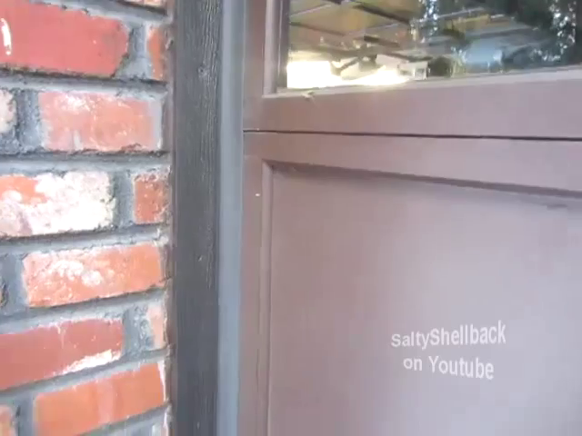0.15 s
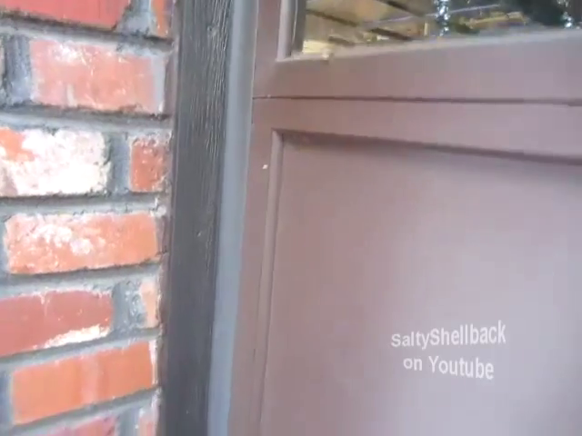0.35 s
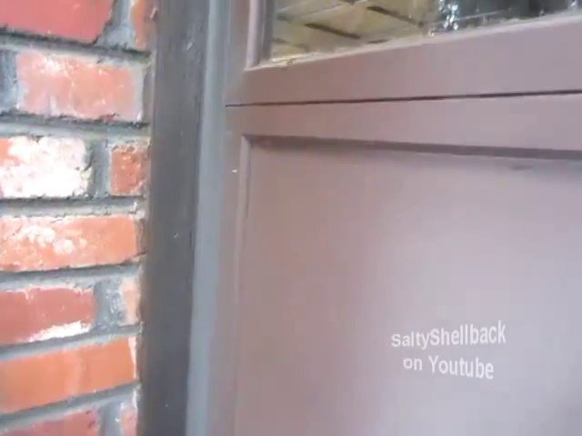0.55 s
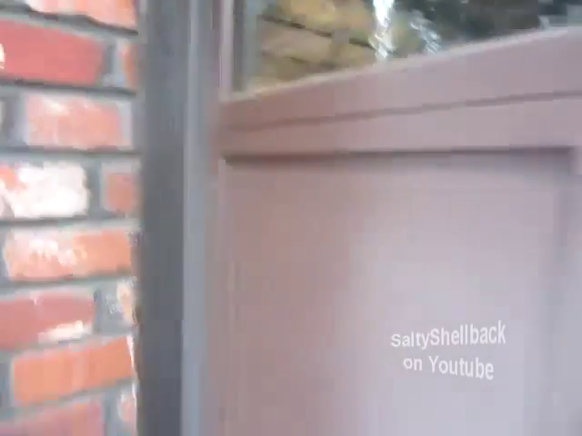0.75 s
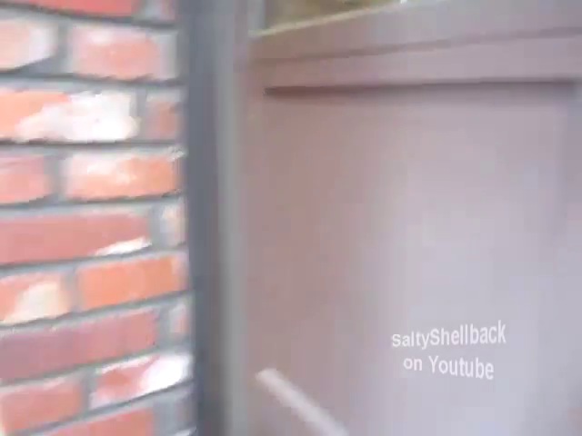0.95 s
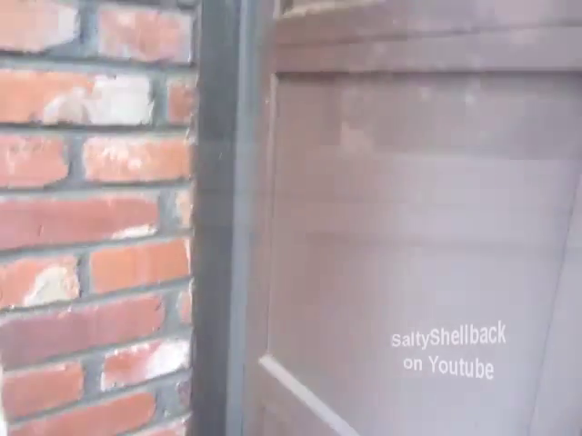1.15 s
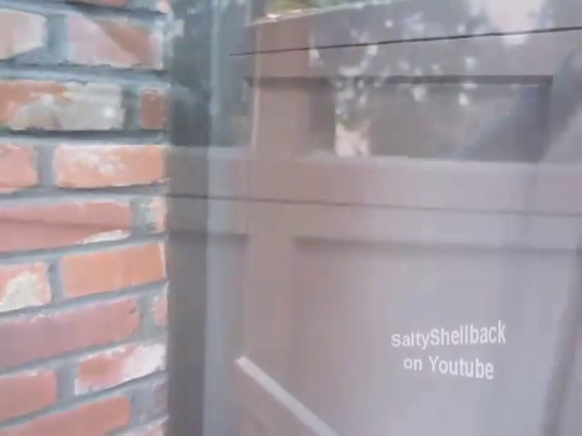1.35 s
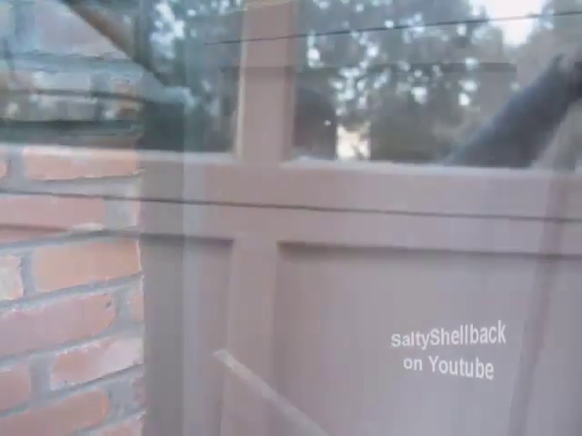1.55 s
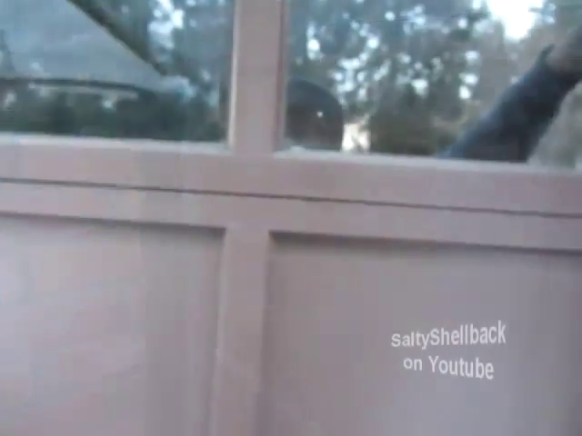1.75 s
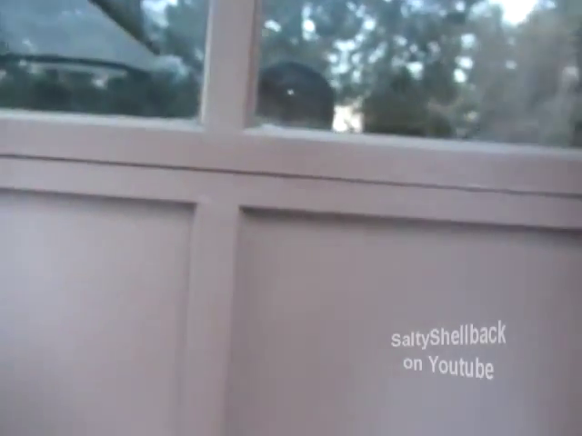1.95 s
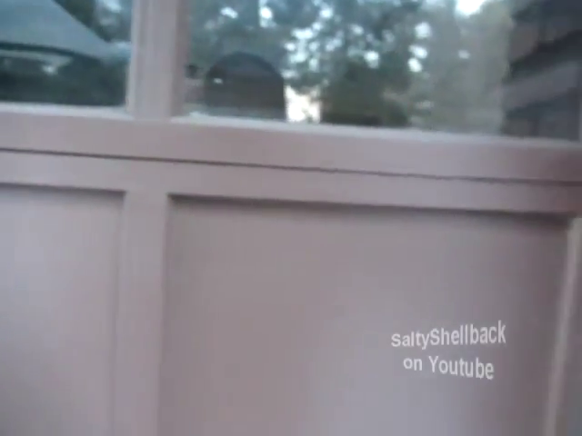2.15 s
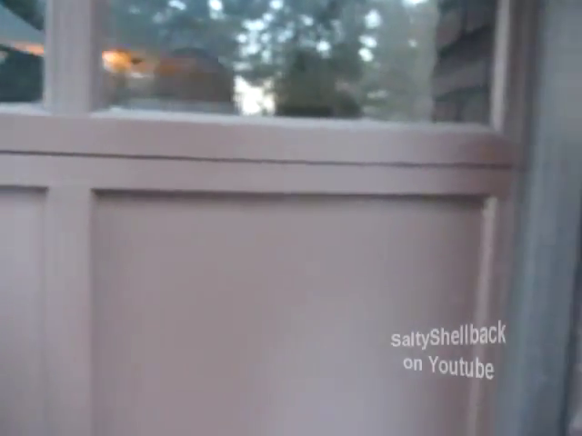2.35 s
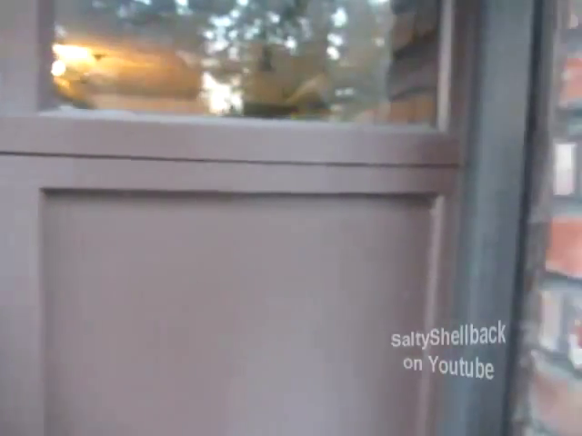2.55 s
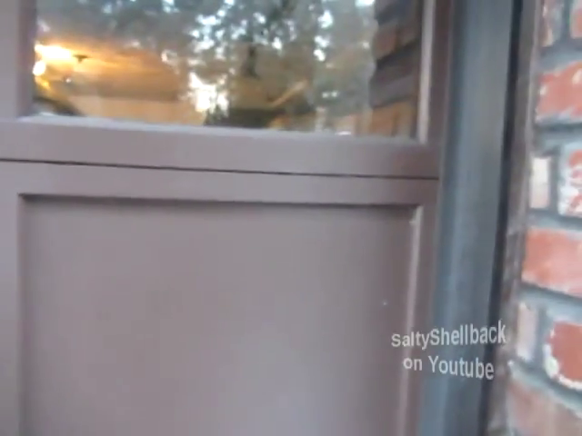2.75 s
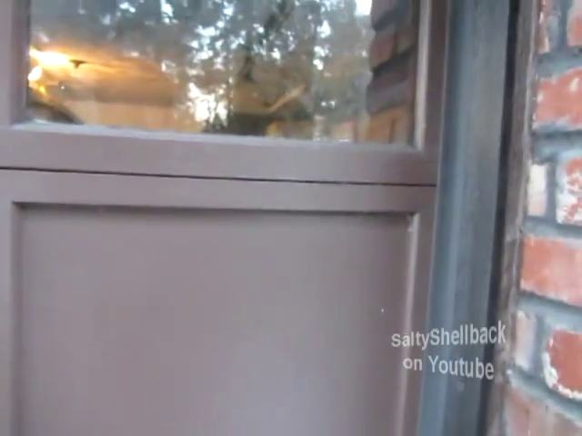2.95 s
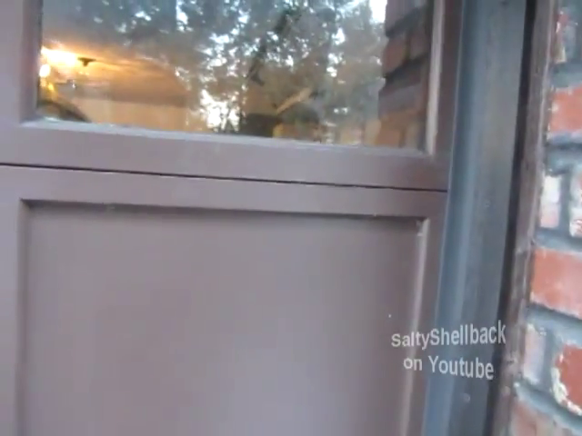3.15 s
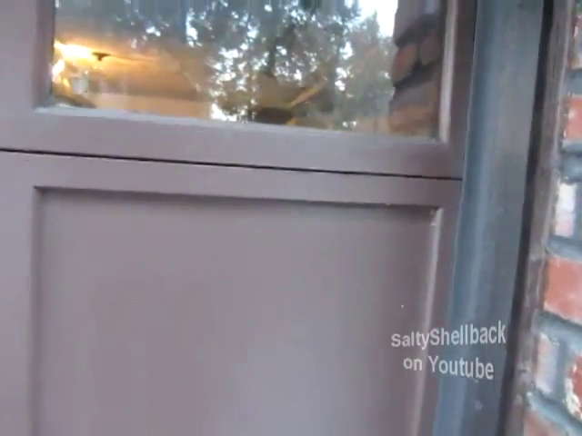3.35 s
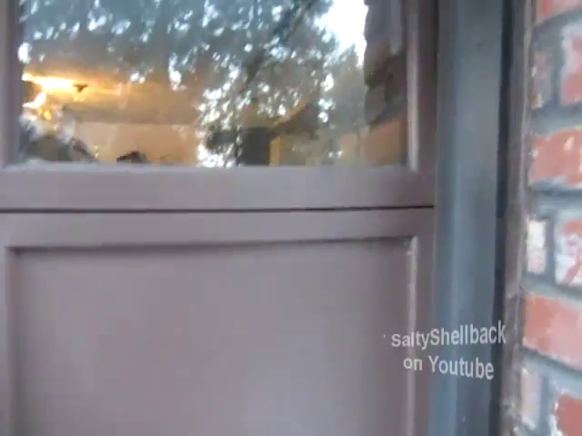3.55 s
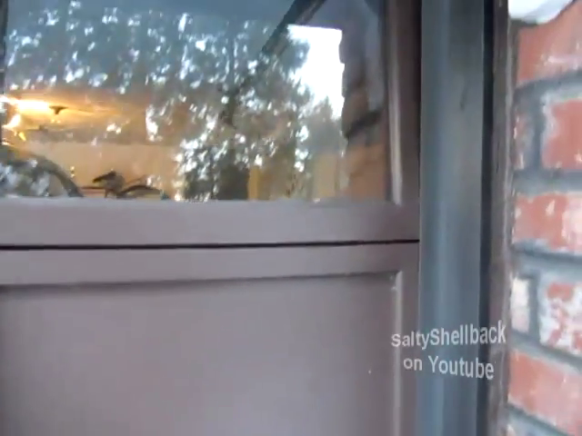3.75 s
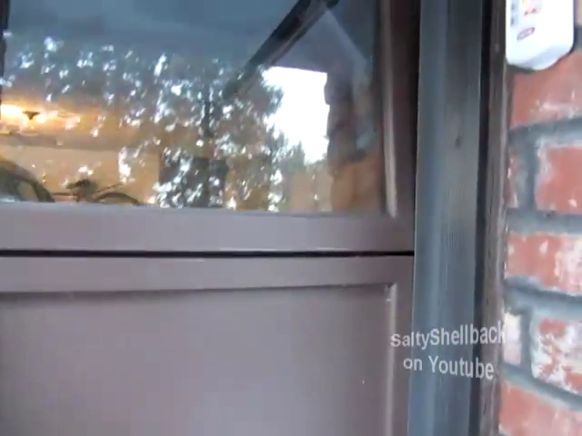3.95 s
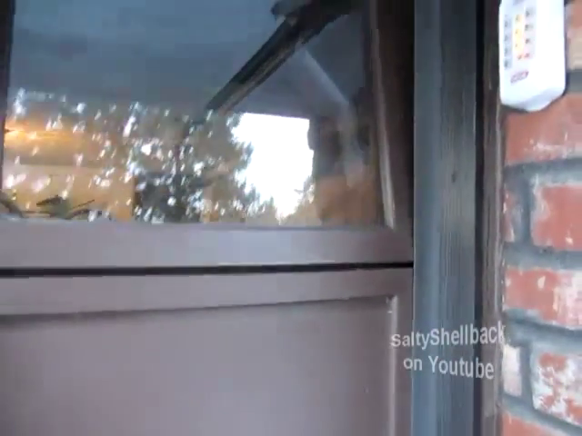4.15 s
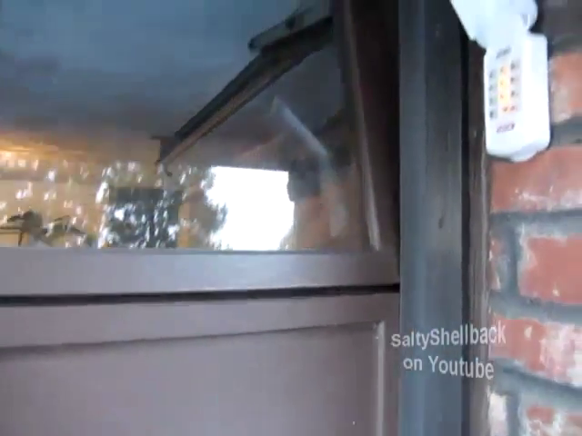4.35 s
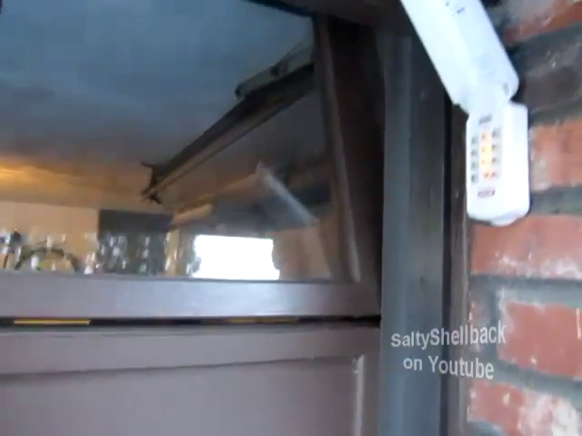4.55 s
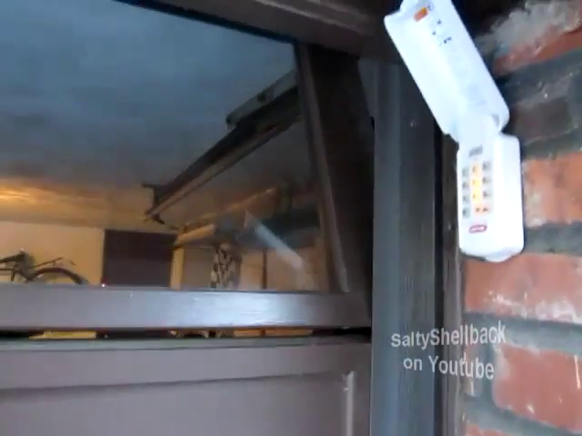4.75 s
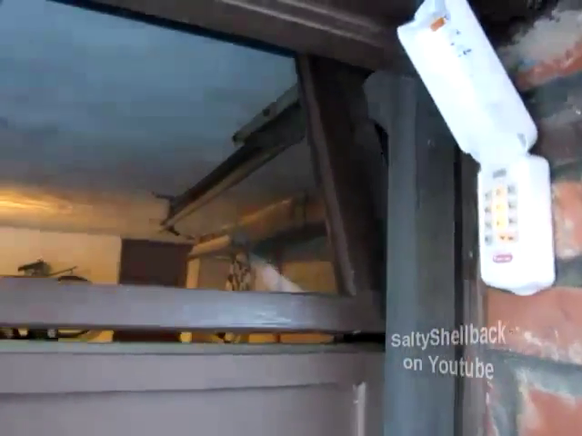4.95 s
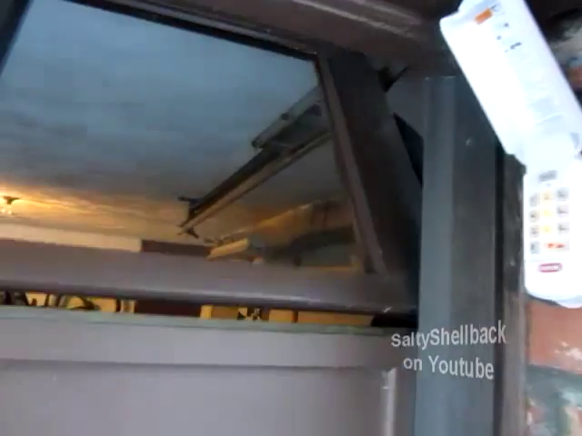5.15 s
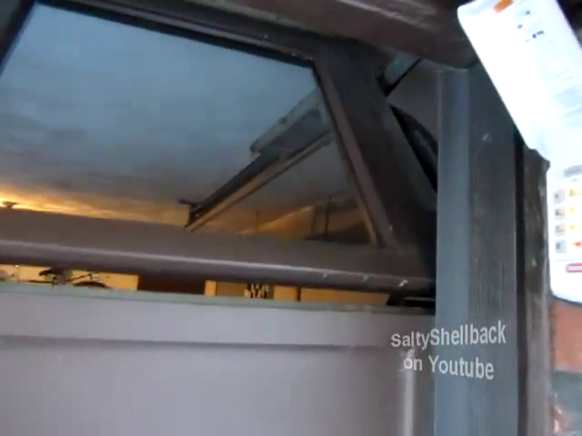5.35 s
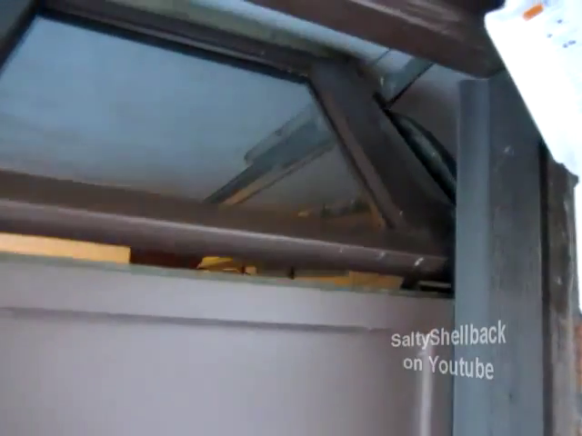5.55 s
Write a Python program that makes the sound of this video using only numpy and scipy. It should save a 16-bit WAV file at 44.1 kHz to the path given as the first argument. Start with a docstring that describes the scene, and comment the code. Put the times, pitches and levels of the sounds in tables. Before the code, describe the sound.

A wooden sectional garage door creaks and ticks, breaks loose with a heavy rattling thump, then rumbles and rattles up its tracks.

```python
"""A wooden sectional garage door is raised, heard in stereo from close by on the driveway.
Its joints creak and tick under strain: short chatters of noise ring the wooden frame and steel hinges.
It breaks free with a rattling thump of damped low sines and rolls up its tracks on tiny random impacts:
panels rumble, rollers and hinges rattle, edges rub along the new weather-stripping and squeak.
The opener's faint whine, a stack of wavering sines, rises behind it, over a dull, quiet background noise."""
import sys
import numpy as np
from scipy import signal
from scipy.fft import rfft, irfft
from scipy.io import wavfile
from scipy.ndimage import uniform_filter1d, minimum_filter1d, map_coordinates

SR = 44100
rng = np.random.default_rng(int(sys.argv[2]) if len(sys.argv) > 2 else 0)


def wrap_up_sound(samples):
    """Save the sound to the file named by the first command line argument, as 16-bit audio."""
    columns = np.atleast_2d(samples).T
    # keep every value between -1 and 1, then stretch to whole-number steps
    tamed = np.clip(columns, -1, 1)
    steps = np.round(tamed * 32767).astype(np.int16)
    wavfile.write(sys.argv[1], SR, steps)


N = 247842
TIME = np.arange(N) / SR
HZ = np.maximum(np.fft.rfftfreq(N, 1 / SR), 1)
LEFT_RIGHT = np.array([[1], [-1]])


def from_db(db):
    """Decibels to gain."""
    return 10 ** (np.asarray(db) / 20)


def rms_one(x):
    """Scale to unit rms."""
    return x / np.sqrt(np.mean(x ** 2) + 1e-20)


def at_hz(points):
    """Read a table over log frequency."""
    hz, value = np.transpose(points)
    return np.interp(np.log(HZ), np.log(hz), value)


def band(x, low_hz, high_hz, order=2):
    """Butterworth band-pass."""
    edges = [low_hz, min(high_hz, SR / 2 - 500)]
    return signal.sosfilt(signal.butter(order, edges, "band", fs=SR, output="sos"), x)


def resonate(x, hz, width_hz):
    """One resonance with about unit gain at its top."""
    radius = np.exp(-np.pi * width_hz / SR)
    zeros = np.array([1, 0, -1]) * (1 - radius * radius) / 2
    poles = [1, -2 * radius * np.cos(2 * np.pi * hz / SR), radius * radius]
    return signal.lfilter(zeros, poles, x + 1e-18)


def drift(rate):
    """Smooth chance of rms 1, with `rate` random knots a second."""
    knots = rng.standard_normal(4000)
    return rms_one(np.interp(TIME * rate, np.arange(len(knots)), knots))


# Balance of the two microphones. Each row: frequency in Hz, left over right in dB.
STEREO_BALANCE = [(120, -1), (300, 0), (1000, 2), (2000, -1), (8000, 0)]


def spread(pair, colour, likeness):
    """Colour two unrelated signals and mix them to left and right with the given likeness; rms 1."""
    mid, side = rfft(pair) * from_db(at_hz(colour))
    alike = np.clip(at_hz(likeness), -1, 1)
    both = np.sqrt(1 + alike) * mid + np.sqrt(1 - alike) * side * LEFT_RIGHT
    return rms_one(irfft(both * from_db(LEFT_RIGHT * at_hz(STEREO_BALANCE) / 2), N))


# Colour of the quiet background noise: low and soft. Each row: frequency in Hz, relative density in dB per Hz.
BACKGROUND_COLOUR = [(20, -23), (45, -12), (85, -4.5), (140, -1.5), (200, -8.5), (460, -10), (850, -15.5),
                     (1300, -22), (3000, -27), (3900, -36), (5500, -31.5), (10900, -42.5), (12500, -71),
                     (15500, -72)]
# How alike the background is at both microphones. Each row: frequency in Hz, likeness from -1 to 1.
BACKGROUND_LIKENESS = [(60, 0.76), (150, -0.76), (380, -0.55), (950, -0.29), (2380, 0.063), (5980, -0.36),
                       (15000, 0.04)]


def background(level_db=-46.5):
    """Steady wide noise, coloured as a dull, quiet background."""
    return from_db(level_db) * spread(rng.standard_normal((2, N)), BACKGROUND_COLOUR, BACKGROUND_LIKENESS)


def contacts(per_s, size_db, smooth, judder_db, judder_rate):
    """Tiny random impacts of uneven size over smooth friction, coming in judders."""
    born = rng.random(N) < per_s / SR
    sizes = from_db(size_db * np.minimum(rng.exponential(1, N), 3))
    grains = rms_one(born * sizes * rng.standard_normal((2, N)))
    friction = smooth * rng.standard_normal((2, N))
    return (grains + friction) * from_db(judder_db * drift(judder_rate))


def rattles(low_hz, high_hz, per_s, width_hz, size_db, count=24):
    """Loose parts of many sizes are jogged at random; each rings briefly at its own pitch."""
    born = rng.random(N) < per_s / SR
    jogs = born * from_db(size_db * rng.standard_normal(N)) * rng.choice([-1, 1], (2, N))
    dealt = rng.integers(0, count, N)
    pitches = np.linspace(low_hz, high_hz, count) + rng.normal(0, width_hz / 2, count)
    return rms_one(sum(resonate(jogs * (dealt == part), hz, width_hz) for part, hz in enumerate(pitches)))


# Resonances that ring along as the door shakes, mostly of the steel tracks and hinges, with a few lines near
# 670, 730 and 940 Hz. Each row: frequency in Hz, width in Hz, relative level in dB.
TRACK_MODES = [(262.8, 12, -1), (284, 10.5, -4), (466, 3.2, -18), (537, 3.9, -32), (670.5, 3, -0.5),
               (730, 2, -0.5), (850, 23, -11), (940, 16, -17), (1062, 5.9, -3.5), (1289, 2.2, 8.5),
               (1486, 50, -6.5), (1790, 23, 5), (2070, 33, -4), (2270, 210, -2), (2930, 20, -3),
               (3630, 21, -3), (4380, 28, -6), (4710, 70, 9), (5700, 60, 4), (6060, 48, 0), (6800, 15, -6),
               (8400, 82, -9)]


def through_tracks(x, ring_db):
    """The tracks, hinges and a few steady lines ring along with what shakes them."""
    ring = sum(from_db(db) * resonate(x, hz, width_hz) for hz, width_hz, db in TRACK_MODES)
    return x + from_db(ring_db) * ring


# Where the door binds and drags on the weather-stripping.
# Each row: start in seconds, length in seconds, roller grind in dB, hinge rattle in dB, seal hiss in dB.
DRAGS = [(0.61, 0.24, -52, -51, -54.5), (0.86, 0.066, -43, -44.5, -49.5),
         (0.965, 0.14, -52.5, -50.5, -56.5), (1.595, 0.015, -46, -49, -51.5),
         (1.645, 0.11, -55, -56, -55.5), (2.342, 0.025, -46.5, -66, -51.5),
         (2.394, 0.11, -53, -57.5, -60.5), (2.805, 0.045, -30, -49, -53), (2.888, 0.087, -28, -57, -70),
         (2.967, 0.041, -41, -28.5, -36.5), (3.055, 0.057, -39, -26, -25.5), (3.154, 0.026, -28, -46, -47),
         (3.29, 0.19, -43.5, -44, -55), (3.689, 0.29, -44.5, -41, -47), (3.986, 0.085, -42, -40.5, -45),
         (4.105, 0.098, -62, -40, -45.5), (4.286, 0.057, -32.5, -41, -56), (4.366, 0.19, -44, -45, -45),
         (4.548, 0.094, -46, -66, -44.5), (4.683, 0.028, -33, -38.5, -64), (4.905, 0.05, -31.5, -59, -65),
         (5.049, 0.074, -36.5, -42, -46.5), (5.364, 0.051, -23, -29.5, -36), (5.45, 0.043, -28, -39, -40.5)]
DRAG_ATTACK_S, DRAG_RELEASE_S = 0.027, 0.018
DRAG_SWELL_SHARE = 0.024   # longer drags also take longer to swell: share of their length
STICK_DB, STICK_PER_S = -1, 180   # spread and rate of the stick-slip flutter


def rubbing():
    """Each drag swells, holds and dies away, sticking and slipping; gains of rollers, hinges and seal."""
    out = 0
    for s, length, *levels in DRAGS:
        attack = np.clip((TIME - s) / (DRAG_ATTACK_S + DRAG_SWELL_SHARE * length), 0, 1)
        release = np.exp(-np.clip(TIME - s - length, 0, 1) / DRAG_RELEASE_S)
        out = out + np.outer(from_db(levels), attack * release)
    return out * rms_one(from_db(STICK_DB * drift(STICK_PER_S)))


def swing(shake, at_s):
    """The shake at given times, in dB above the mean of its rows."""
    s, db = np.transpose(shake)
    return np.interp(at_s, s, db) - db.mean()


# How alike the door is at both microphones. Each row: frequency in Hz, likeness from -1 to 1.
DOOR_LIKENESS = [(60, 0.88), (130, 1), (290, 0.65), (640, 0.7), (1410, 0.39), (3100, 0.24), (6820, 0.25),
                 (15000, 0.13)]


def moving_door(shake, parts, colour, sources, drags):
    """Panels, rollers, hinges and seal each sound in their own range and follow the shake; drags add."""
    start, end = shake[0][0], shake[-1][0]
    moving = np.interp(TIME, [start - .02, start + .02, end - .02, end + .02], [0, 1, 1, 0])
    ranges_hz = [(25, 300), (300, 1300), (1300, 4000), (4000, 17000)]
    out, shake_db = 0, swing(shake, TIME)
    for source, drag, (db, follows), (low, high) in zip(sources, drags, parts, ranges_hz):
        gain = np.hypot(from_db(db + follows * shake_db), drag)
        out = out + gain * spread(band(source, low, high, order=4), colour, DOOR_LIKENESS)
    return out * np.sqrt(moving)


# How hard the door shakes as it strains, breaks free and rolls; only the change within a table counts.
# Each row: time in seconds, shake in dB.
STRAIN_SHAKE = [(0, -56.5), (.5, -54.5), (1.55, -52.5), (2.6, -52.5)]
JOLT_SHAKE = [(2.6, -63), (2.618, -50), (2.738, -38), (2.878, -36.5), (2.886, -31), (2.958, -41),
              (2.976, -29), (3.026, -31), (3.04, -25.5), (3.114, -22.5), (3.264, -52.5), (3.27, -44)]
TRAVEL_SHAKE = [(3.2, -41), (3.54, -42), (3.72, -42.5), (3.91, -39), (4.8, -32.5), (5.37, -32),
                (5.519, -22.5), (5.62, -24)]
# Panels, rollers, hinges and seal, one row for each, in the same three phases.
# Each row: level in dB at the mean shake, dB gained per dB of shake.
STRAIN_PARTS = [(-57, 2.5), (-56, 1.5), (-63.5, 0), (-69, 1.5)]
JOLT_PARTS = [(-33, 0.83), (-37, 1.11), (-43.5, 0.96), (-51.5, 0.51)]
TRAVEL_PARTS = [(-35.5, 0.58), (-37.5, 0.78), (-41.5, 0.51), (-47.5, 0.48)]
# Colour of the door breaking free, and of it straining or rolling.
# Each row: frequency in Hz, relative density in dB per Hz.
JOLT_COLOUR = [(20, -24), (40, 0), (80, 5), (130, 7), (200, 2.5), (290, 3), (450, -5.5), (760, -4),
               (1200, -11.5), (2070, -16.5), (3880, -30.5), (6890, -32), (8950, -45.5), (11000, -57),
               (15500, -78)]
ROLL_COLOUR = [(20, -14), (42, -8), (60, -1.5), (120, 4.5), (170, 2), (270, -2), (420, -6), (890, -9.5),
               (1200, -14.5), (2250, -20), (3200, -24.5), (7500, -28.5), (11500, -40.5), (14000, -45.5),
               (15800, -55)]


def door():
    """The same contacts and loose parts play through all three phases of the lift."""
    panels = contacts(per_s=760, size_db=-0.5, smooth=0.83, judder_db=2.0, judder_rate=25)
    rollers = contacts(per_s=420, size_db=1.5, smooth=1.0, judder_db=0.74, judder_rate=42)
    rollers = rollers + from_db(-13.5) * rattles(283.0, 1336.7, per_s=150, width_hz=21.0, size_db=-0.5)
    hinges = contacts(per_s=900, size_db=1, smooth=1.0, judder_db=0.5, judder_rate=45)
    hinges = hinges + from_db(-6.5) * rattles(1356.6, 3898, per_s=220, width_hz=22.7, size_db=-0.5)
    seal = contacts(per_s=4000, size_db=-5.0, smooth=1.0, judder_db=0.9, judder_rate=45)
    seal = seal + from_db(-9.0) * rattles(4220, 11630, per_s=83, width_hz=43, size_db=-1.5)
    sources = [through_tracks(panels, ring_db=-8), through_tracks(rollers, ring_db=4.5),
               through_tracks(hinges, ring_db=-24.0), through_tracks(seal, ring_db=-12.0)]
    drags = [0, *rubbing()]   # the panels do not rub
    strain = moving_door(STRAIN_SHAKE, STRAIN_PARTS, ROLL_COLOUR, sources, drags)
    jolt = moving_door(JOLT_SHAKE, JOLT_PARTS, JOLT_COLOUR, sources, drags)
    travel = moving_door(TRAVEL_SHAKE, TRAVEL_PARTS, ROLL_COLOUR, sources, drags)
    return strain + jolt + travel


# A slipped joint settles with a weaker second slip: its delay, level and scatter of the delay.
REBOUND_S, REBOUND_DB, REBOUND_SCATTER = .007, -21, .25


def slip(t, rise, sharpness=0.86):
    """Envelope of one slip and its rebound; the chatter builds and stops quickly."""
    delay = REBOUND_S * np.exp(REBOUND_SCATTER * rng.standard_normal())
    first, second = t / rise, np.maximum(t - delay, 0) / rise
    rebound = from_db(REBOUND_DB) * (second * np.exp(-second)) ** sharpness
    return (first * np.exp(-first)) ** sharpness + rebound


def with_ring(chatter, hz, envelope, clean):
    """A clean release turns a share of the chatter into a ping at the part's own pitch; rms 1."""
    clean = np.clip(clean, 0, 1)
    ping = envelope * np.sin(2 * np.pi * hz * TIME[:len(envelope)])
    return rms_one(np.sqrt(1 - clean) * rms_one(chatter) + np.sqrt(clean) * rms_one(ping))


# Knocks and slips in the joints. Each row: start in seconds, hinge level in dB, wood over hinge in dB,
# tick over hinge in dB, hinge pitch in Hz, wood pitch in Hz, rise time in seconds,
# clean ring from 0 to 1, left over right in dB.
JOINT_CLACKS = [(.302, -53, 2, -19, 2200, 690, 0.00091, 0.3, -5),
                (.316, -48.5, -1, -13, 2160, 695, .003, 0.2, -6),
                (.494, -63, 23.5, -15, 2500, 670, 0.0022, 0.8, -1),
                (.499, -61.5, 17, -15, 2550, 416, 0.0027, 0.8, -1),
                (.5035, -44, -10, 3, 3650, 626, 0.00086, 0, -7.5),
                (.5632, -38.5, -10, -19, 2260, 700, 0.0011, 0.4, -2),
                (.571, -43, -2.5, -3.5, 2200, 800, 0.0029, 0.3, -5),
                (.597, -45, -5, -6, 2270, 700, 0.0025, 0.3, -7),
                (.645, -50, -4, -17, 2200, 700, 0.0018, 0, -7),
                (.6795, -38, 9, -23, 2320, 672, 0.0021, 0.37, 0),
                (.7032, -36, -7, -10, 2130, 810, 0.0012, 0.25, -5),
                (.717, -52, -6, -16, 2000, 800, 0.0017, 0, -1),
                (.7465, -42.5, -8, -20, 2180, 744, 0.0011, 0.5, 0),
                (.812, -54, 14.5, -14, 2100, 630, 0.0033, 0.7, 1),
                (.8515, -42, -4, -26, 2200, 860, 0.0024, 0.15, 3),
                (.859, -40.5, 2.5, -18, 2700, 730, 0.0024, 0, 2),
                (.889, -47.5, 12.5, 5.5, 2570, 624, 0.0039, 0.03, 0),
                (.9135, -43.5, 6, -22, 2740, 623, 0.0029, 0.23, 6),
                (.9535, -43, 0.5, -13, 2400, 735, .0015, 0.1, -1),
                (1.0125, -41.5, -0.5, -19, 2970, 433, 0.00078, 0, 2),
                (1.044, -57, -2, 2, 2500, 700, .0014, 0.05, -5),
                (1.076, -45.5, -1, -16, 1990, 700, 0.0024, 0.02, 5),
                (1.098, -57, 12, -14, 1500, 875, 0.0023, 0.1, 3),
                (1.1252, -42, 1, -8.5, 3080, 815, 0.00073, 0.14, 5.5),
                (1.13, -44, 5, -20, 1600, 776, 0.0018, 0.1, 2),
                (1.167, -56, 7, -6, 1600, 900, .0012, 0.2, -2),
                (1.272, -50, -11, 3, 3180, 700, 0.0013, 0.04, -7),
                (1.297, -52, -3, -4, 2980, 700, 0.002, .1, -7),
                (1.3555, -42, -29, -5, 1750, 700, 0.00049, 0.4, -8.5),
                (1.589, -60.5, -7, 4, 3200, 700, 0.00074, 0.05, -8),
                (1.611, -52.5, 10, -0.5, 1800, 420, 0.0033, 0.3, -12),
                (1.7025, -44.5, -12, -9, 2760, 700, 0.001, 0, -12),
                (1.8585, -35.5, -10, -14, 1860, 1100, 0.0016, 0.35, -4),
                (1.862, -45, -0.5, -25, 1670, 1220, 0.004, 0.37, -1),
                (2.73, -51, 15.5, -15, 2200, 644, 0.019, 0.9, 0),
                (2.7605, -34.5, -7, 9.5, 2400, 653, 0.0022, 0.05, 1),
                (2.8019, -29.5, -12, -13.5, 2810, 700, 0.0011, 0.33, -2),
                (2.812, -46, 9, 2, 2950, 1150, 0.0022, .4, 2),
                (2.8268, -40, -14, 0, 3180, 700, 0.00068, 0.2, 1),
                (2.8835, -24.5, -3.5, -7.5, 2120, 560, 0.0019, 0.08, -2),
                (2.908, -43.5, 15, -14, 1960, 640, 0.0054, 0.5, 0),
                (2.926, -47, 14, -19, 2000, 796, .005, 0.1, -2),
                (2.950, -50, 0, -13, 2600, 700, .0012, 0, -2),
                (2.972, -33, 0, -25, 2400, 600, 0.0034, 0.4, 8),
                (2.9837, -24.5, -18, -3, 1440, 600, 0.0022, 0.05, 3),
                (3.005, -41, 9, 3, 2300, 715, 0.0016, 0.2, -1),
                (3.032, -31.5, 13.5, -18, 2640, 610, .0035, 0.46, -2),
                (3.0395, -19, -4, -2.5, 2090, 564, 0.0021, 0.25, 0.5),
                (3.049, -26, 4, -10, 2800, 477, 0.0028, 0.05, 6),
                (3.0665, -28, 4, -5, 1620, 700, 0.0021, 0.36, -1),
                (3.070, -34.5, 15.5, -12, 1770, 445, 0.0047, 0.85, 9),
                (3.0825, -30, 10, -6, 1490, 700, 0.0021, 0.2, 7),
                (3.0975, -33, -6, -2.5, 1980, 497, 0.0017, 0.2, 3),
                (3.128, -28.5, 7, -10, 1740, 700, 0.0035, .3, -2),
                (3.142, -36.5, 12, -18, 1700, 900, 0.0041, .2, 0),
                (3.186, -48, 18, -15, 1800, 725, 0.0073, 0.76, -1),
                (3.473, -50, -6, -3, 2600, 700, .0015, 0.2, 0),
                (3.515, -42, 1.5, -17, 2460, 700, 0.0016, 0, 2),
                (3.8526, -36, -15, -2, 2500, 700, 0.0016, 0.2, 0),
                (3.8921, -34, -0.5, -5, 2120, 613, 0.0026, 0.05, 1),
                (3.9075, -41.5, -10, 4, 2400, 700, 0.0029, 0.2, -2),
                (4.1511, -39.5, -8, 4, 2620, 700, 0.0021, 0.2, 0),
                (4.176, -39.5, -19, 2.5, 2330, 700, 0.0021, 0.3, 5),
                (4.316, -39.5, 6.5, -22, 1380, 803, 0.0041, 0.8, 12),
                (4.378, -42, 2, 4.5, 2760, 700, 0.0018, 0.03, 3),
                (4.426, -41.5, 7.5, -11, 1520, 980, 0.0035, 0.45, -1),
                (4.474, -49, -6, 9, 2500, 700, 0.0025, 0.1, 0),
                (4.4858, -37.5, -11, 5, 2570, 700, 0.002, 0.4, -1),
                (4.512, -40, -15, 0, 2480, 700, 0.0025, 0.3, -1),
                (4.5705, -30.5, -1.5, -5.5, 2090, 850, 0.0017, 0.26, 1),
                (4.574, -19.5, -10, -7.5, 2270, 890, 0.0015, 0.43, -0.5),
                (4.64, -32.5, -0.5, -21, 1640, 790, 0.0017, 0.43, 1),
                (4.659, -43, 4, -18, 1703, 860, .002, .3, -2),
                (4.705, -38, 4, -15, 1440, 470, 0.0036, .2, 6),
                (4.7385, -45, 0, 1, 2200, 700, .001, 0.3, 1),
                (4.746, -35.5, 4.5, -20, 1480, 650, 0.0038, 0.25, 4),
                (4.808, -48, 13, -17, 1800, 786, 0.0022, 0.4, 2),
                (4.833, -45, 12, -1, 2000, 600, .003, 0.26, 2),
                (4.872, -34, -1, 6, 2860, 1010, 0.0021, 0.06, -3),
                (4.914, -37, 1, -25, 1930, 700, 0.0018, 0.33, 6),
                (4.960, -47, 13, -15, 1990, 677, .003, 0.5, 1),
                (5.043, -44, 13, -17, 2000, 686, .0035, 0.5, 2),
                (5.0632, -33, 1, 3.5, 3060, 700, 0.0019, 0.06, -2),
                (5.0865, -42, -1, 5.5, 2600, 700, 0.0021, 0, 1),
                (5.127, -43, 7, -12, 2100, 680, 0.0016, 0.2, 2),
                (5.227, -41.5, -4, 0, 2400, 700, 0.0025, 0.1, 0),
                (5.3095, -42.5, 13, 7, 2400, 700, 0.0075, 0.2, 1.5),
                (5.349, -36.5, 4, -5, 2000, 824, 0.0026, 0.2, 1),
                (5.3955, -25, 1.5, 0, 1948, 480, 0.0023, .2, 1.5),
                (5.406, -29, -7, -17, 3370, 600, 0.0021, 0.4, 1),
                (5.479, -36, 3, 0, 1400, 563, 0.0051, 0.2, 11),
                (5.5535, -28.5, -3, -2.5, 2445, 700, 0.004, 0.2, -1),
                (5.5842, -36, -4, 6.5, 2880, 700, 0.003, 0, 1),
                (5.614, -37.5, -8, 7, 3180, 700, 0.00088, 0, 0)]
# Resonances of the wooden frame. Each row: multiple of its pitch, width in Hz, relative level in dB.
FRAME_MODES = [(.56, 140, 8), (1, 100, 8), (1.16, 230, 7), (1.41, 400, 4), (2.07, 520, 5)]
TICK_HZ, TICK_OCTAVE_DB = 5930, 52   # tick pitch when level with the hinge; dB of tick per octave higher


def clacks(rows, hinge_width_hz=650, hinge_wide=0.21, tick_width_hz=2400, tick_wide=1.0, tick_reach=1.5,
           wood_apart=0.88, steel_apart=1.0):
    """A joint slips: milliseconds of chatter ring the wooden frame and a steel hinge, with a bright tick."""
    size = SR // 12
    t, out = np.arange(size) / SR, np.zeros((2, N + 2 * size))
    for s, hinge_db, wood_over_db, tick_over_db, hinge_hz, wood_hz, rise, clean, pan_db in rows:
        wood_db, tick_db = hinge_db + wood_over_db, hinge_db + tick_over_db
        tick_hz = TICK_HZ * 2 ** (tick_over_db / TICK_OCTAVE_DB)
        envelope = slip(t, rise)
        mid, side = rng.standard_normal((2, size)) * envelope
        side = side * LEFT_RIGHT
        soft, hard = mid + wood_apart * side, mid + steel_apart * side

        wood = sum(from_db(db) * resonate(soft, multiple * wood_hz, width_hz)
                   for multiple, width_hz, db in FRAME_MODES)
        wood = with_ring(band(wood, 108, 1.62 * wood_hz), wood_hz, envelope, clean)

        hinge = resonate(hard, hinge_hz, hinge_width_hz) + hinge_wide * hard
        hinge = band(hinge, 0.72 * hinge_hz, 2700 + 0.25 * hinge_hz, order=4)
        hinge = with_ring(hinge, hinge_hz, envelope, clean)

        # a higher tick is a harder contact and reaches further up
        tick = resonate(hard, tick_hz, tick_width_hz) + tick_wide * hard
        tick = band(tick, 3450, tick_reach * tick_hz, order=3)
        knock = from_db(wood_db) * wood + from_db(hinge_db) * hinge + from_db(tick_db) * rms_one(tick)

        # a snap at the very top grows faster than the tick
        snap_db = tick_db - 21 + 0.25 * (tick_db + 39)
        knock = knock + from_db(snap_db) * rms_one(band(hard, 5600, 25000, order=3))
        # levels are those of the energy packed into a hundredth of a second
        knock = knock * np.sqrt(SR / 100 / size)
        start = int(s * SR)
        out[:, start:start + size] += knock * from_db(LEFT_RIGHT * pan_db / 2)
    return out[:, :N]


SMALL_WOOD_HZ, SMALL_SLIP_S = 700, 0.0018   # light clacks and crackles: wood pitch, rise time
CRACKLE_DB, CRACKLE_HZ = -11.5, 2400   # level relative to the drag's hinge rattle; middle hinge pitch


def crackles(count=2, wood_db=-6, pitch_octaves=0.24):
    """Clack rows of tiny slips scattered through every drag, as bright as its hiss."""
    chance = rng.random((len(DRAGS), count, 2))
    rows = []
    for (s, length, _, rattle_db, hiss_db), draws in zip(DRAGS, chance):
        for when, pitch in draws:
            start = s + DRAG_ATTACK_S + length * when
            hinge_hz = CRACKLE_HZ * 2 ** (pitch_octaves * (2 * pitch - 1))
            rows.append((start, rattle_db + CRACKLE_DB, wood_db, hiss_db - rattle_db,
                         hinge_hz, SMALL_WOOD_HZ, SMALL_SLIP_S, 0, 0))
    return rows


def garage(x, t60_s=0.11, wall_cut_hz=5000):
    """The room behind the door answers with a dying wash of echoes."""
    t = TIME[:SR // 2]
    echoes = band(rng.standard_normal((2, len(t))), 200, wall_cut_hz, order=1)
    echoes = echoes * from_db(-60 * t / t60_s) * (1 - np.exp(-t / 0.0083))
    return signal.fftconvolve(x, rms_one(echoes) / np.sqrt(len(t)), axes=1)[:, :N]


# Soft bumps that set a panel booming.
# Each row: start in seconds, level in dB, pitch in Hz, rise time of the lowest mode in seconds.
PANEL_BUMPS = [(1.607, -45, 133, 0.012), (2.633, -34, 136, 0.0098), (2.685, -31, 155, .008),
               (2.726, -21, 145, 0.0097), (2.767, -27, 128, .012), (2.831, -25, 161, 0.0066),
               (2.883, -17.5, 246, 0.0036), (2.908, -22.5, 157, 0.0095), (2.984, -19, 131, 0.015),
               (3.042, -22, 241, 0.0058), (3.061, -10, 90.6, 0.0072), (3.075, -18, 66, 0.014),
               (3.114, -23, 126, 0.0095), (3.165, -14, 284, 0.0088), (3.229, -29, 114, 0.016),
               (4.047, -30, 131, 0.017), (4.249, -25, 279, 0.0038), (4.28, -25.5, 196, 0.014),
               (4.31, -28.5, 333, 0.024), (4.54, -28, 230, .006), (4.557, -20.5, 356, 0.007),
               (4.632, -23.5, 118.3, 0.013), (4.818, -17, 117.6, 0.011), (4.928, -22, 120, 0.0073),
               (5.085, -26, 273, .015), (5.335, -25.5, 260, 0.0095), (5.397, -12, 247, 0.0021),
               (5.44, -19.5, 224, 0.013), (5.465, -22, 100, .012)]
# Modes of a booming panel. Each row: multiple of its pitch, level in dB relative to the bump.
PANEL_MODES = [(1, -3.5), (1.5, -16.5), (2.3, -12.5)]


def thumps():
    """Each bump swings a heavy, damped panel for a few cycles; its higher modes die sooner."""
    out, t = np.zeros(N + SR // 2), TIME[:SR // 2]
    for s, db, hz, rise in PANEL_BUMPS:
        start = int(s * SR)
        for multiple, mode_db in PANEL_MODES:
            age = t * multiple / rise
            boom = np.sin(2 * np.pi * multiple * hz * t) * age * np.exp(1 - age)
            out[start:start + len(t)] += from_db(db + mode_db) * boom
    return out[:N]


# Thin squeaks of the rollers and seal.
# Each row: start in seconds, length in seconds, level in dB, pitch in Hz, resonance width in Hz.
FRICTION_SQUEAKS = [(2.973, .035, -41.5, 8900, 200), (4.348, .02, -41.5, 7760, 1000),
                    (4.386, 0.052, -44, 7700, 1000), (4.62, .04, -46, 8000, 1000),
                    (4.675, 0.091, -40, 2055, 110), (5.457, 0.079, -30.5, 1322, 30),
                    (5.472, 0.029, -32, 6080, 600), (5.474, .035, -37, 5370, 150),
                    (5.514, 0.022, -36, 5800, 1000)]


def squeaks():
    """Friction briefly catches on a resonance, swelling and fading."""
    friction, out = rng.standard_normal((2, N)), 0
    for s, length, db, hz, width_hz in FRICTION_SQUEAKS:
        tone = resonate(resonate(friction, hz, width_hz), hz, width_hz)
        swell = np.sin(np.pi * np.clip((TIME - s) / length, 0, 1))
        out = out + from_db(db) * rms_one(tone) * swell
    return out


# Light clacks: hinge at the mean shake; wood and tick over hinge; middle hinge pitch.
SMALL_DB, SMALL_WOOD_DB, SMALL_TICK_DB, SMALL_HZ = -50, -1, -5, 2200
SMALL_PER_S, SMALL_SCATTER_DB = 10, 3


def small_clacks(pitch_octaves=0.26, pan_db=3):
    """Clack rows at random moments of the travel, stronger as the door shakes more."""
    start, end = TRAVEL_SHAKE[0][0], TRAVEL_SHAKE[-1][0]
    times = start + np.cumsum(rng.exponential(1, size=60)) / SMALL_PER_S
    chance = rng.standard_normal((len(times), 5))
    rows = []
    for s, (loud, wood, tick, pitch, pan) in zip(times, chance):
        if s < end:
            hinge_db = SMALL_DB + swing(TRAVEL_SHAKE, s) + SMALL_SCATTER_DB * loud
            wood_over_db = SMALL_WOOD_DB + SMALL_SCATTER_DB * wood
            tick_over_db = SMALL_TICK_DB + SMALL_SCATTER_DB * tick
            hinge_hz = SMALL_HZ * 2 ** (pitch_octaves * pitch)
            rows.append((s, hinge_db, wood_over_db, tick_over_db, hinge_hz,
                         SMALL_WOOD_HZ, SMALL_SLIP_S, 0, pan_db * pan))
    return rows


# The opener's drive gathers speed in a soft start.
# Each row: time in seconds, turning rate in Hz, whine level in dB before the tones' own gains.
DRIVE_SPEED = [(3.75, 153, -55), (4.0, 170.7, -53), (4.2, 189, -46), (4.5, 208.3, -51), (4.72, 218, -52),
               (5.0, 225.7, -42), (5.14, 228.5, -39), (5.26, 231.4, -39), (5.4, 231.5, -40),
               (5.62, 227, -40)]
# Its gear and motor tones. Each row: multiple of the turning rate, relative level in dB.
DRIVE_TONES = [(1.17, -3), (1.66, -5), (3, -2.5), (4, 0), (8, -11), (24, -14), (32, -24)]
DRIVE_WOBBLE, DRIVE_FLICKER_DB = .0015, 3   # share of the speed; swing of each tone
DRIVE_BRIGHTENS = .3   # the higher a tone, the more speed it needs to be heard


def opener(flicker_rate=9, apart=0.73):
    """The drive whines behind the door, following its speed; tones waver on their way through the garage."""
    s, hz, db = np.transpose(DRIVE_SPEED)
    speed = np.interp(TIME, s, hz) * (1 + DRIVE_WOBBLE * drift(20))
    turns, out = np.cumsum(speed) / SR, 0
    for multiple, tone_db in DRIVE_TONES:
        phase = 2 * np.pi * multiple * turns + apart * drift(flicker_rate) * LEFT_RIGHT
        flicker = from_db(tone_db + DRIVE_FLICKER_DB * drift(flicker_rate))
        brightening = (speed / hz.max()) ** (DRIVE_BRIGHTENS * multiple)
        out = out + flicker * brightening * np.sin(phase)
    return out * np.interp(TIME, s, from_db(db), left=0)


def scene():
    """The door, its knocks and their echo, over a dull, quiet background."""
    rolling = door() + squeaks() + opener()
    knocks = clacks([*JOINT_CLACKS, *small_clacks(), *crackles()])
    knocks = through_tracks(knocks, ring_db=-24)
    echo = from_db(-17.5) * garage(knocks)
    return background() + rolling + knocks + echo + thumps()


def limit(x, ceiling_db=-4.0):
    """A fast limiter ducks the highest peaks on both channels together."""
    size = SR // 200
    gain = np.minimum(1, from_db(ceiling_db) / (np.abs(x).max(axis=0) + 1e-9))
    return x * uniform_filter1d(minimum_filter1d(gain, size), size)


def record(dry, left_lag_s=.00003, cutoff_hz=15900):
    """Sound reaches the left microphone a moment later; peaks are limited and the top is cut steeply."""
    left = map_coordinates(dry[0], [np.arange(N) - left_lag_s * SR], order=3, mode="nearest")
    limited = limit(np.array([left, dry[1]]))
    return signal.sosfilt(signal.ellip(10, .1, 80, cutoff_hz, fs=SR, output="sos"), limited)


dry = scene()
out = record(dry)
wrap_up_sound(out)
```